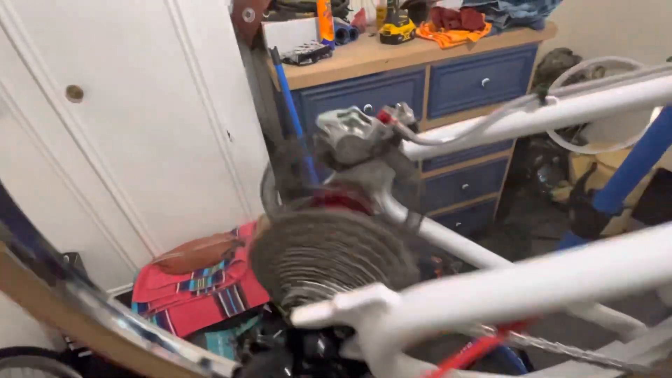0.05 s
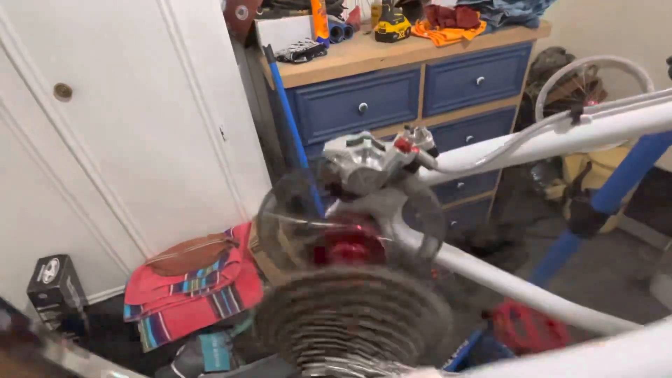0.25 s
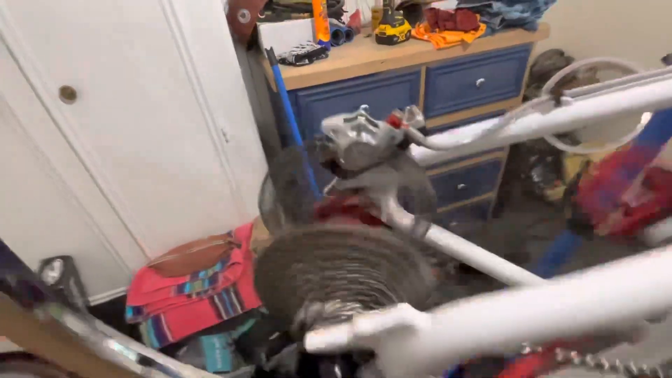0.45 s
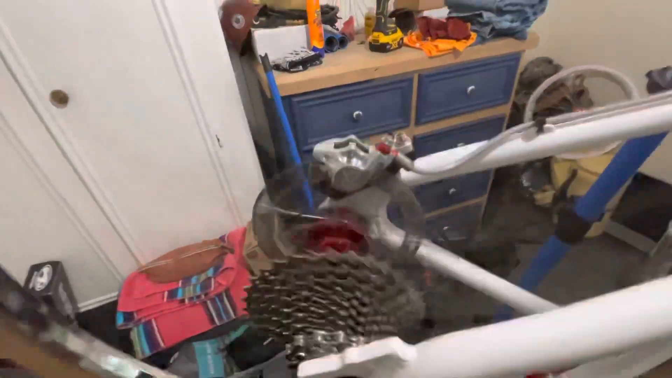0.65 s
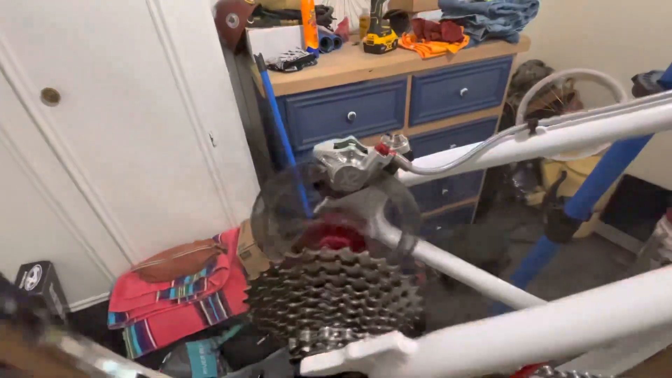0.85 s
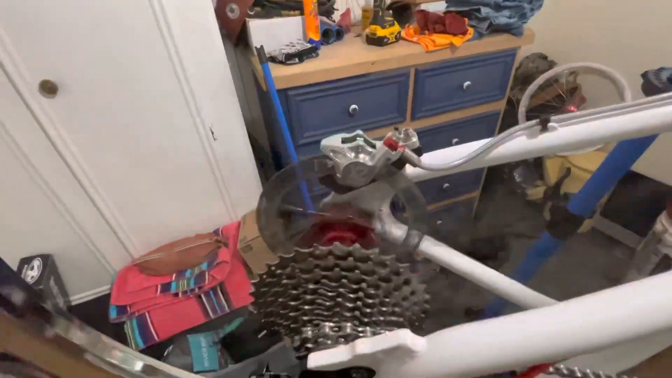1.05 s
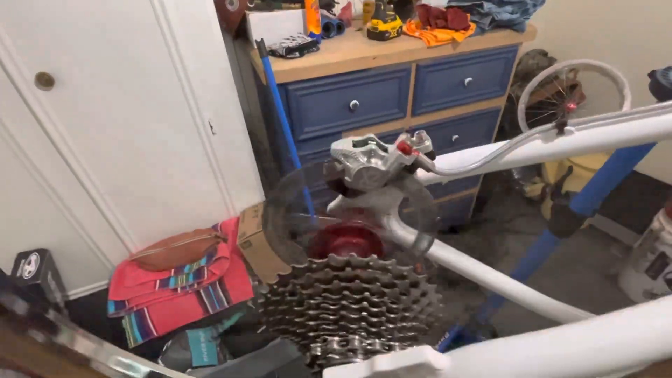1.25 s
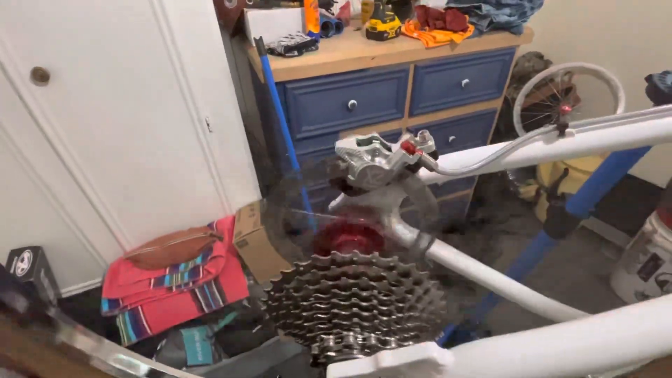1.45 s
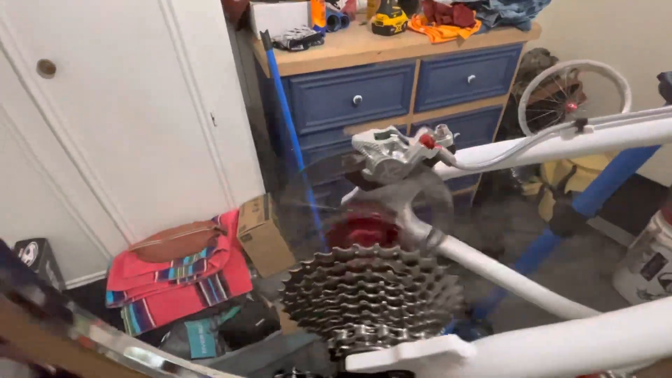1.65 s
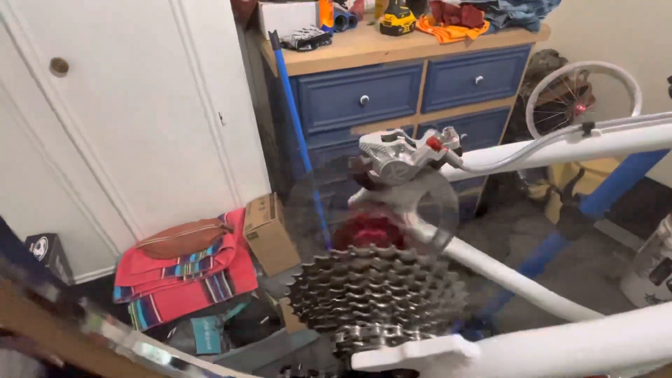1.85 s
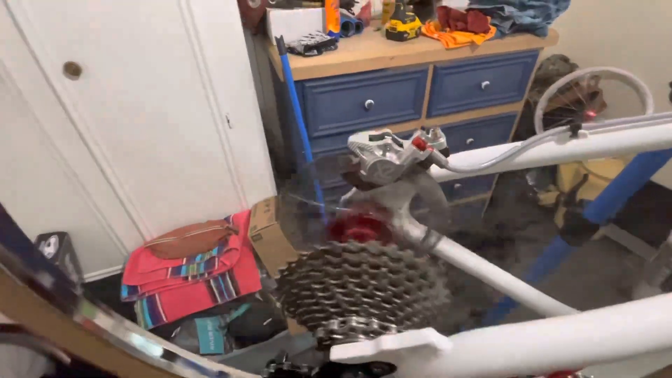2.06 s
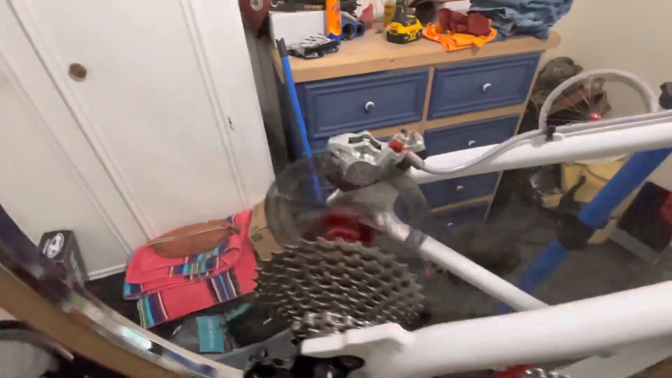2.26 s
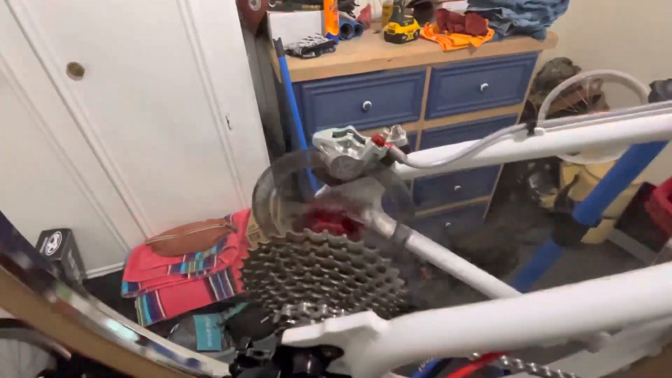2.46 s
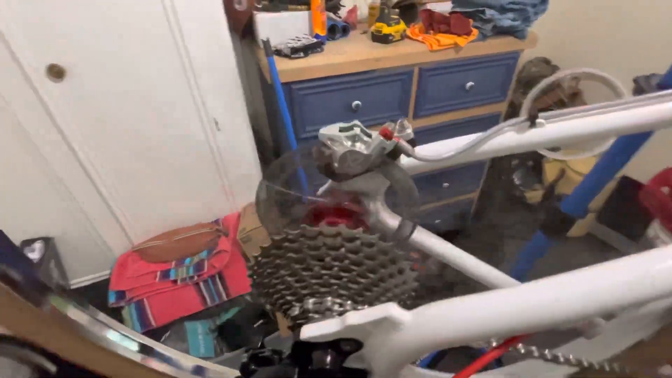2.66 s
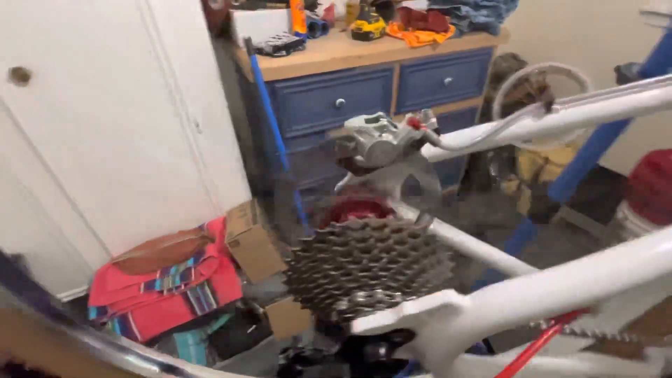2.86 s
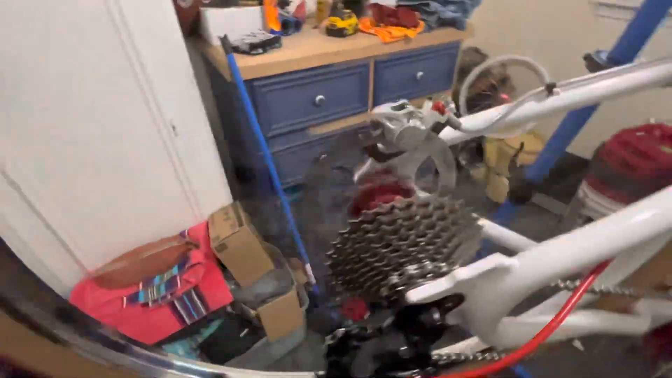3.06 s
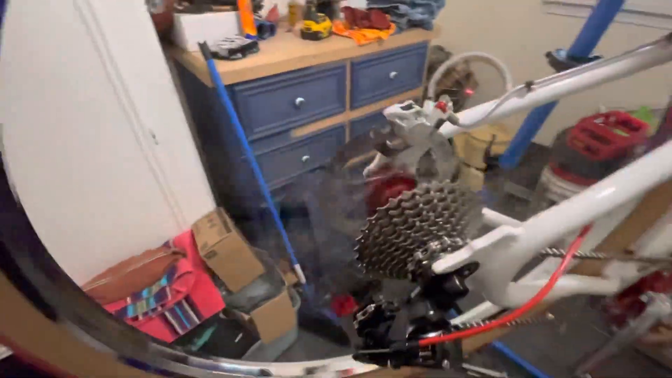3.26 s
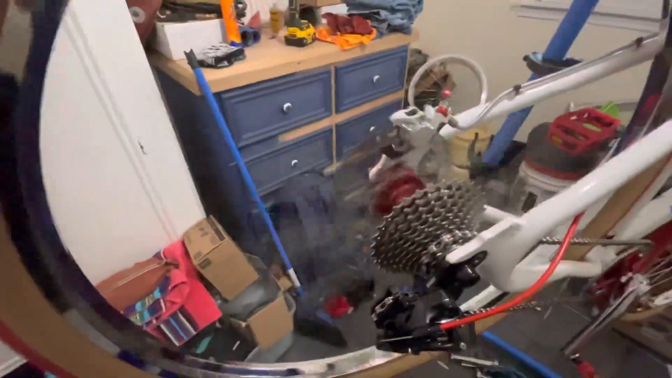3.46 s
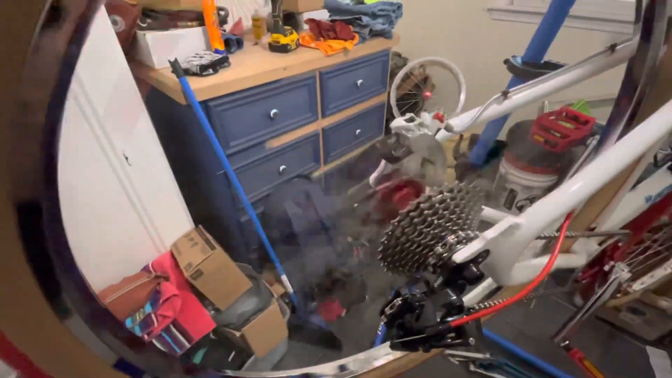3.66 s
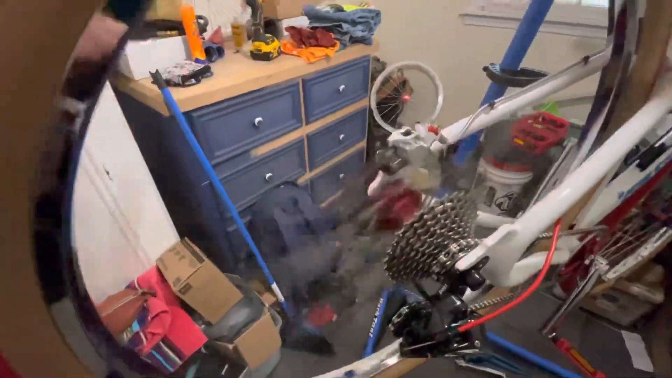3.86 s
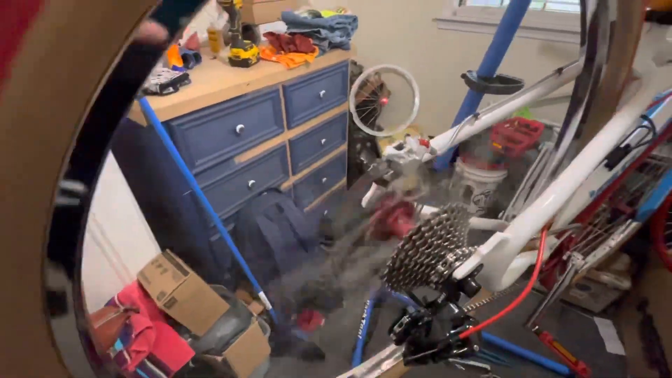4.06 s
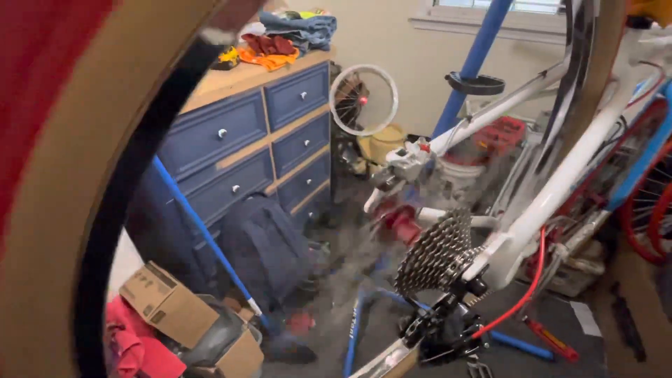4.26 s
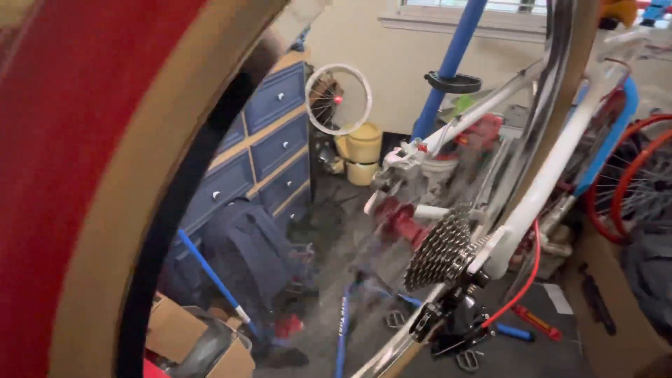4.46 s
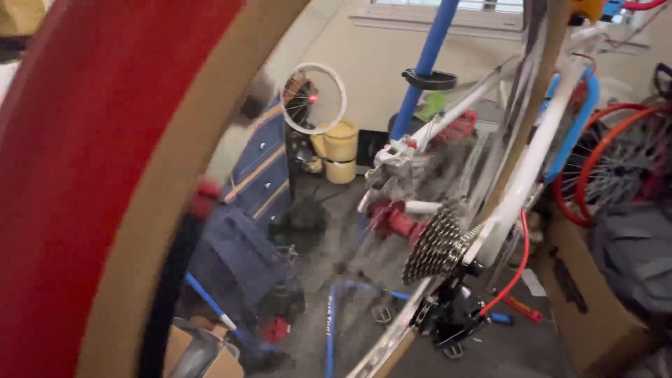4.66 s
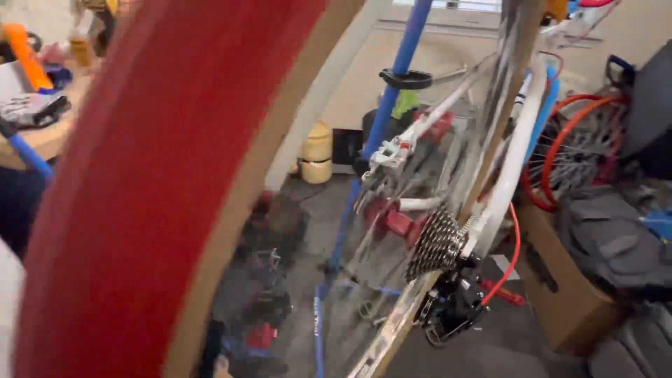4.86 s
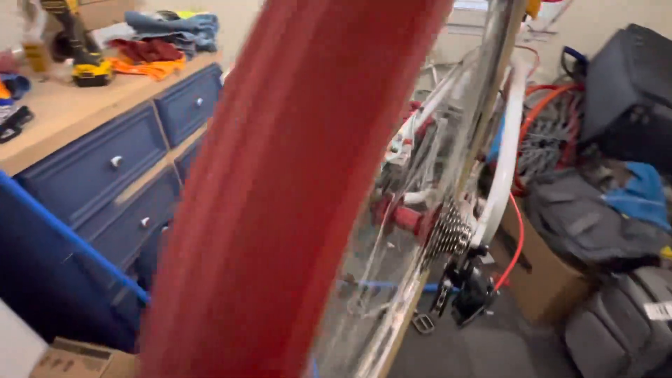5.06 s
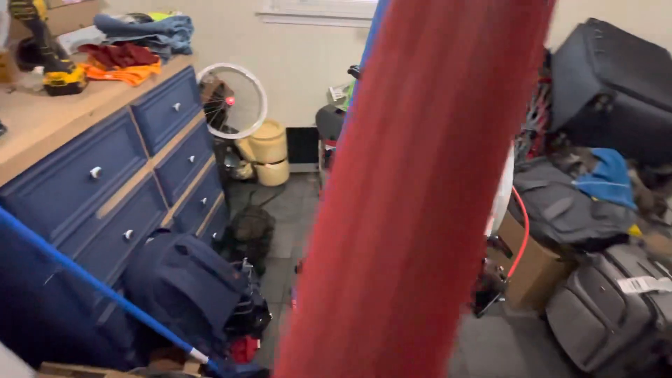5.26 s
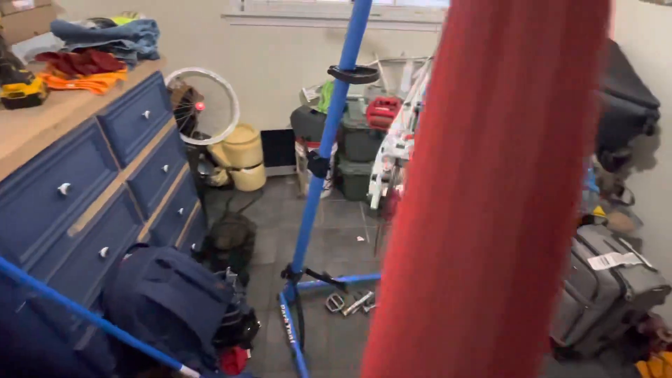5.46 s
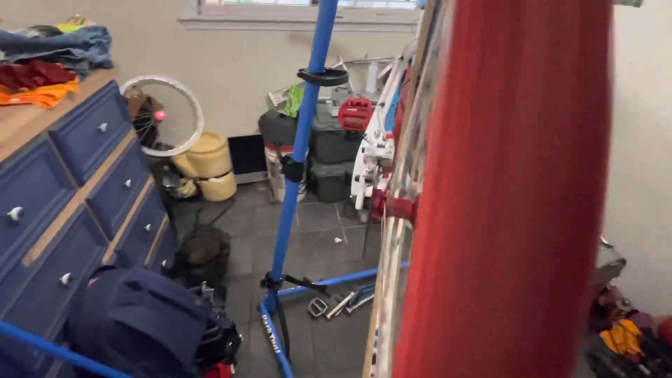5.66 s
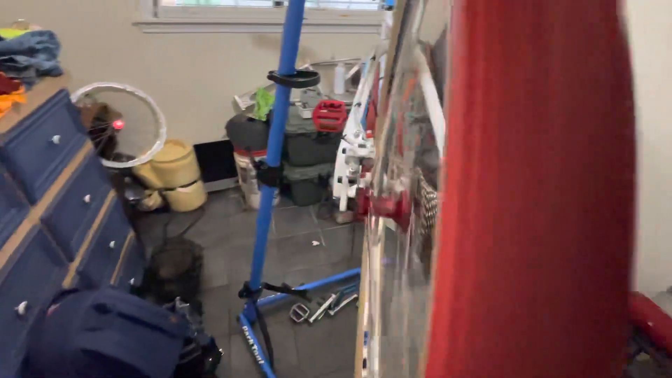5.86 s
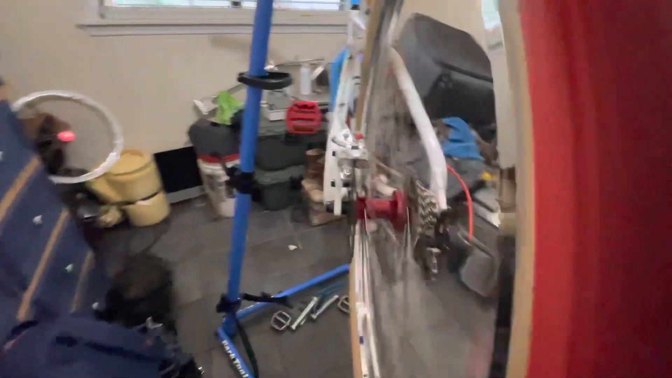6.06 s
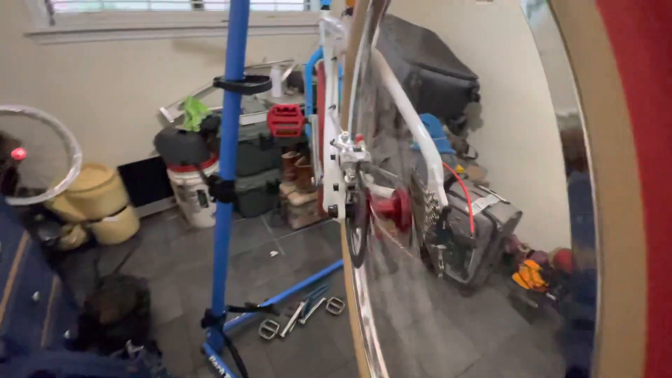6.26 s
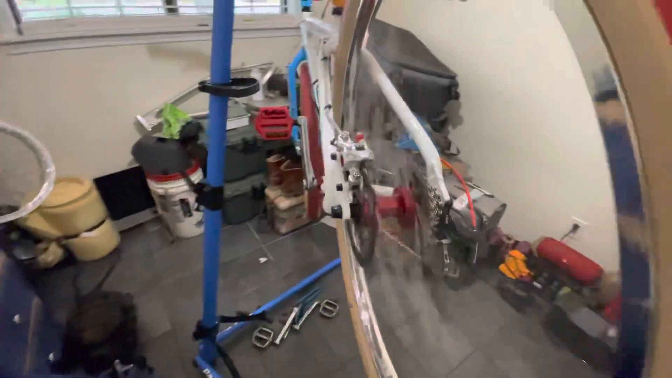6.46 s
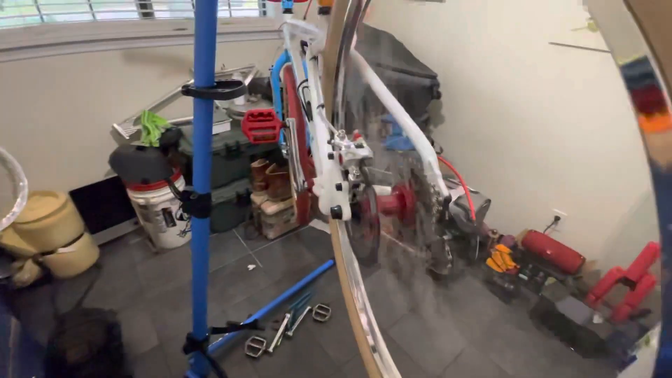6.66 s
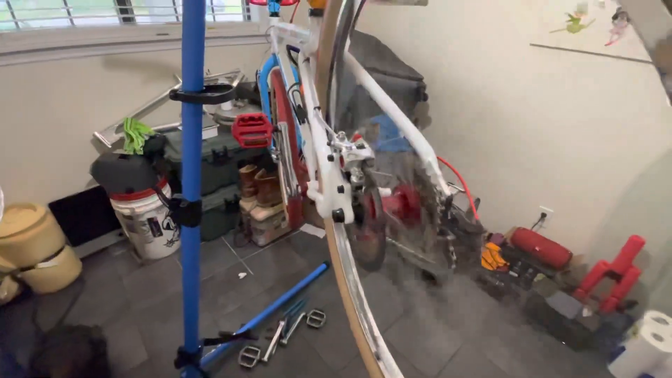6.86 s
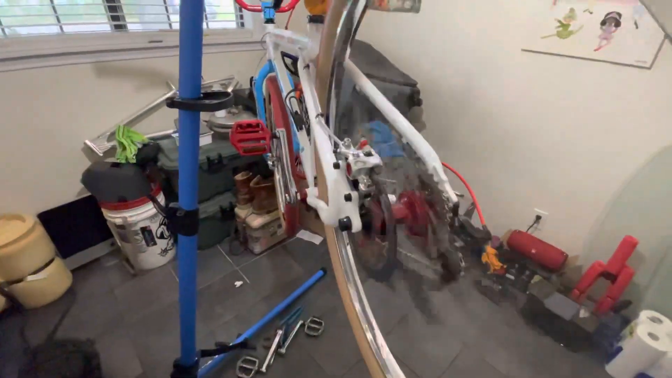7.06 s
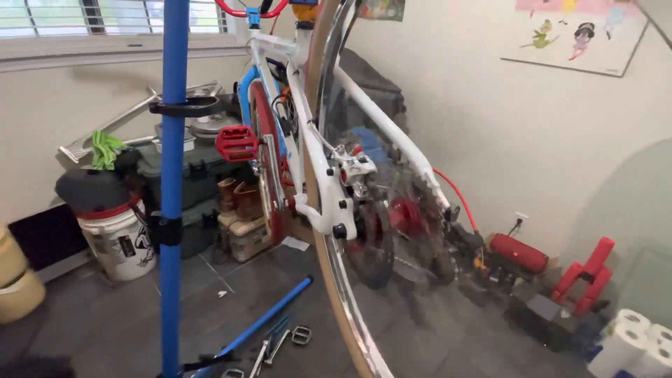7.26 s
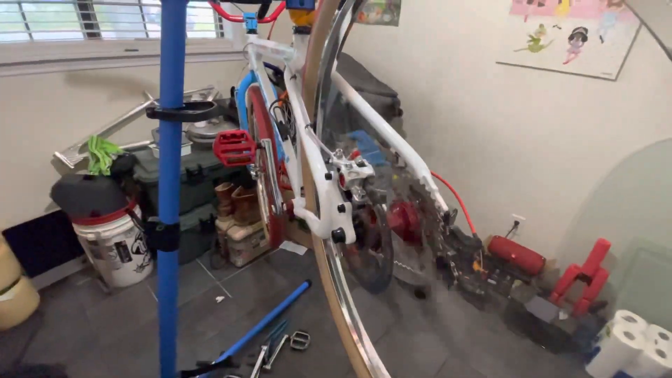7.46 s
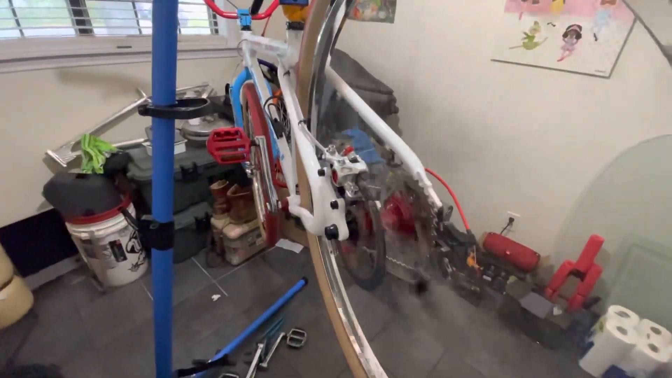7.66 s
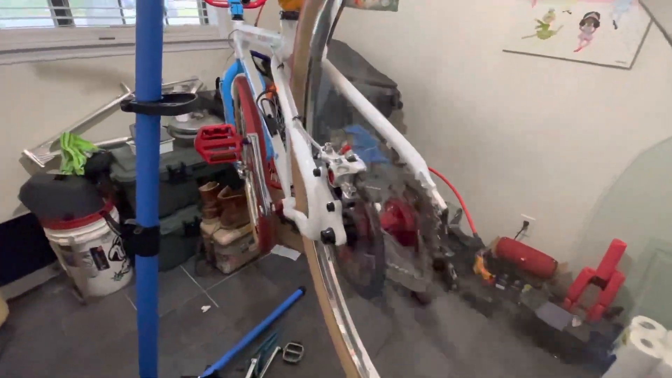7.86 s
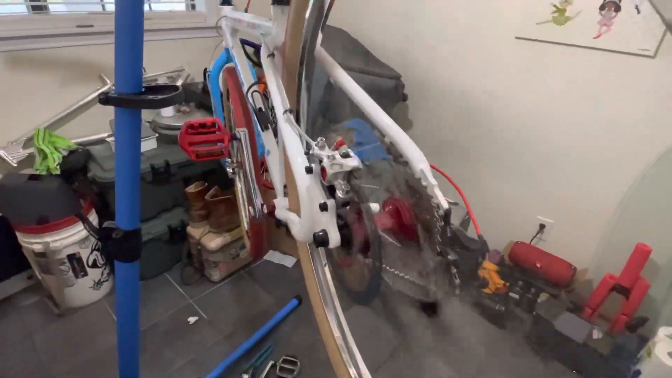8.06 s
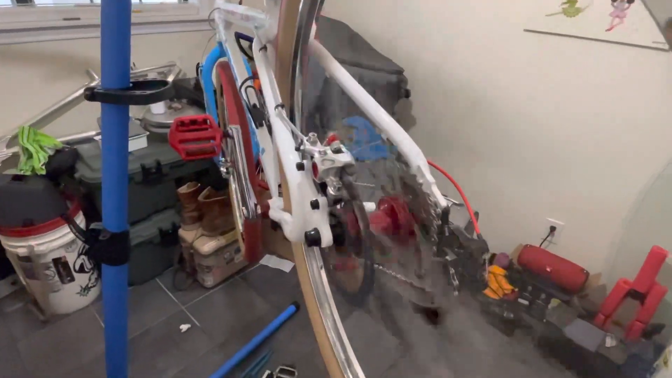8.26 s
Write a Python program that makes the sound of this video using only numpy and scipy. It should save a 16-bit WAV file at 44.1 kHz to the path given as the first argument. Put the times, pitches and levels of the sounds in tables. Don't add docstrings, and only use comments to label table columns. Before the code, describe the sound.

Loud, bright ratcheting buzz of a coasting bicycle hub in a small room, after half a second of chain clatter, still spinning at the end.

```python
import sys
import numpy as np
from scipy import signal
from scipy.fft import rfft, irfft
from scipy.io import wavfile
from scipy.ndimage import uniform_filter1d

SR = 44100
rng = np.random.default_rng(int(sys.argv[2]) if len(sys.argv) > 2 else 0)


def persist_wave(psi):
    counts = np.round(np.clip(psi, -1, 1) * 32767).astype(np.int16)
    wavfile.write(sys.argv[1], SR, np.atleast_2d(counts).T)


def rack_gain(trim_db):
    fader = np.asarray(trim_db, float)
    return 10 ** (fader / 20)


N = 366912
RING_TEETH = 68
# t/s, level/dB
GUSTS = [
    [(0.0, -43.5), (0.12, -49), (0.46, -49), (0.99, -45), (1.25, -49), (1.4, -52), (1.63, -57), (1.87, -62),
     (2.0, -81)],
    [(2.3, -75), (2.59, -62), (2.884, -61), (2.996, -74), (3.2, -77)],
    [(4.95, -65), (5.14, -64), (5.312, -40), (5.402, -44.5), (5.598, -55), (5.698, -62), (5.83, -62),
     (6.0, -78)],
]


def hub():
    # t/s, teeth passing a pawl f/Hz
    teeth = [(0.53, 122.9), (0.57, 196), (0.61, 267.2), (0.75, 326), (0.81, 314.8), (0.94, 332.3),
             (1.05, 321), (1.24, 335), (1.51, 319.5), (1.98, 333.9), (2.07, 347.7), (2.35, 312),
             (2.44, 315.6), (2.61, 287), (2.8, 302.1), (5.9, 271.6), (8.32, 249.7)]
    # t/s, level/dB, resonance f/Hz
    shell_heard = [(0.53, -27.5, 9000), (0.61, -19, 8840), (0.77, -24, 8760), (1.05, -22, 8900),
                   (1.37, -27, 9100), (2.46, -26.5, 8800), (3.0, -27.5, 9060), (3.5, -28.5, 8760),
                   (3.65, -28.5, 8700), (4.5, -29, 8800), (5.2, -31.5, 9240), (5.67, -30.5, 8860),
                   (6.1, -27, 9200), (6.93, -26.5, 8980), (7.45, -26, 9080), (8.32, -26.5, 8800)]
    # f/Hz, density/dB per Hz
    click = [(480, -17), (610, -11.5), (750, -17.5), (880, -7.5), (1100, -5), (1330, 4), (1550, 3),
             (2400, 5.5), (3300, -2.5), (4150, -8), (5200, -6), (5900, -6), (6500, -4), (7900, 2),
             (9300, -5), (11800, -16), (12800, -21), (14300, -21.5), (15800, -16.5)]
    # f/Hz, level/dB, t60/s, change on the far side/dB
    modes = [(2400, -22, .025, 1), (3290, -21, .018, 3), (3890, -33, .03, 4), (4520, -26, .02, 2),
             (5300, -26, .014, 3.5), (6240, -29, .02, -1), (8000, -16, .007, 1), (8900, -17, .007, -1),
             (9722, -17.5, .028, -1), (10640, -22, .025, 1.5), (12225, -24, .025, 4), (13160, -28, .035, 3),
             (14138, -24.5, .035, -2), (14359, -23, .1, 0)]
    # t/s, level/dB
    cogs_in_view = [
        (0, -3),
        (2.5, -2.5),
        (4.5, -5),
        (5.4, -12.5),
        (6.2, -8.5),
        (8.32, -4),
    ]
    # t/s, level/dB
    rattle = [(0.5, 4), (0.8, 3), (1.2, 3.5), (2.2, 2.5), (3, 3), (4.6, 3.5), (5.4, 3.5), (6.5, 2.5),
              (8.32, 3.5)]
    crossovers = [2810, 6210, 8260, 11380]
    far_side_s = 5.0, 6.0

    turning, teeth_hz = curves(teeth)
    phase = np.cumsum(teeth_hz * (turning > .5)) / SR
    drops, rebounds = pawls(phase)
    strikes = drops + rack_gain(11) * band(rebounds, 6300, 21500, order=5)
    strikes = smear(strikes + rack_gain(curves(rattle)[1]) * band(rebounds, 2420, 6200, order=1))
    strikes = level(colour(strikes, click), 0)

    _, facing_db = curves(cogs_in_view)
    far = np.interp(np.arange(N) / SR, far_side_s, [0, 1])
    body = strikes
    for hz, db, t60, far_db in modes:
        view_db = facing_db + far_db * far + glint_db(hz) + 1.4 * walk(3)
        body = body + level(ring(strikes, hz, t60), db + 1.5) * rack_gain(view_db)
    body = spokes(body, phase)
    body = body + rack_gain(-7) * walls(body)

    wheel, middle, low_shell, high_shell, top = split(body, crossovers)
    gate, shell_db, shell_hz = curves(shell_heard)
    lean_db = 10.5 * (shell_hz - 8400) / 1000
    shell = low_shell * rack_gain(-lean_db) + high_shell * rack_gain(lean_db)
    parts = [(shell, 0.072 * walk(4.1)), (wheel, -11 - 0.52 * facing_db),
             (middle, -5.5), (top, 1.06 + 0.12 * facing_db)]
    mix = sum(level(x, db) * rack_gain(0.34 * walk(12)) for x, db in parts)
    return gate * rack_gain(shell_db + 0.4 * walk(35)) * mix


def pawls(phase, scatter_db=1.63, runout=0.011, wander=0.015, bounce_s=0.000403):
    # error in place/tooth, spring strength level/dB
    seats = [(0.05, -7), (0.09, -10), (0.08, -7.5), (0.06, -9.5), (0.02, -7), (0.01, -6)]
    # t/s, share of their error
    off_place = [(0.5, 1.04), (0.9, 1.33), (1.3, 1.87), (1.9, 1.9), (2.5, 1.37), (2.8, 0.99), (4.4, 0.78),
                 (5.5, 0.82), (7, 1.01), (8.32, 0.94)]
    cranks_stop_s, crank_shake = 2.6, 1.2

    t, cut = np.arange(N) / SR, round_wheel(count=2, size=4)
    clock = phase + t * 1e-6
    drops, rebounds, drop = np.zeros(N), np.zeros(N), np.arange(3000)
    spread = np.interp(drop, clock, curves(off_place)[1])
    for k, (error, db) in enumerate(seats):
        chance = rng.standard_normal((len(drop), 6))
        seat = k * RING_TEETH / len(seats)
        tooth = (drop + int(seat)) % RING_TEETH
        drift = wander * walk(5)[drop * (N // len(drop))]
        place = drop + 1 - seat % 1 + error * spread + runout * cut[0, tooth] + drift
        s = np.interp(place, clock, t, right=N)
        force = rack_gain(db + 0.1 * cut[1, tooth] + scatter_db * chance[:, 0])
        s = s + 1.25e-5 * (1 + crank_shake * (s < cranks_stop_s)) * chance[:, 1]
        drops -= impulses(s, force)
        first_s = s + bounce_s * (.5 + np.abs(chance[:, 2]))
        second_s = s + bounce_s * (1.506 + np.abs(chance[:, 4]))
        rebounds += impulses(first_s, force * np.tanh(chance[:, 3]))
        rebounds += impulses(second_s, 0.97 * force * np.tanh(chance[:, 5]))
    return drops, rebounds


def smear(x, share=0.62):
    shell_paths = [5, 11, 19, 31]
    for lag in shell_paths:
        gap = np.zeros(lag - 1)
        x = signal.lfilter(np.r_[-share, gap, 1], np.r_[1, gap, -share], x)
    return x


def glint_db(ring_hz):
    # t/s, ring f/Hz, level/dB, half length/s
    glints = [(0.9, 12225, 3, .3), (1.4, 12225, -4, .15), (1.85, 12225, 4, .25), (2.3, 14138, 3, .35),
              (2.8, 14138, -6, .15), (2.4, 9722, -4, .2), (3.0, 9722, 3, .3), (3.45, 10640, 5, .3),
              (3.45, 12225, 3, .2), (4.45, 5250, 6, .3), (4.4, 14138, 3, .3), (4.5, 14359, -5, .2),
              (6.5, 13160, 4, .4), (6.7, 4520, 4, .3), (7.2, 3890, 7, .12), (1.6, 8000, -6, .4),
              (.75, 8900, 3, .2), (.75, 14138, -4, .3), (4.5, 8000, 3, .5), (6.6, 8900, 3, .5),
              (1.55, 3290, 3, .4), (2.3, 6240, 3, .3), (3.2, 6240, 3, .3), (5.5, 3290, 4, .3),
              (7.7, 3290, 3, .5), (7.9, 5250, 3, .5), (7.9, 3890, 4, .3)]
    t = np.arange(0, N, 64) / SR
    total_db = np.zeros(len(t))
    for s, hz, db, half_s in glints:
        if hz == ring_hz:
            total_db += db * np.exp(-((t - s) / half_s) ** 2)
    return np.repeat(total_db, 64)[:N]


def spokes(body, phase, flicker_db=5.5):
    pattern_edges = [1050, 1500, 2200, 3000]
    lobe_depths = [0.4, 0.2, 0.2, 0.18, 0.05]
    close_levels = [0.88, 0.24, -0.59, -1.5, 0.6]
    late_levels = [2, 2, 3.5, -1.5, 0.5]

    lobes = round_wheel(count=len(lobe_depths), size=3)
    angle, teeth = phase % RING_TEETH, np.arange(RING_TEETH + 1)
    t = np.arange(N) / SR
    close = np.interp(t, (1.52, 2.8), [1, 0])
    late = np.interp(t, (7.0, 8.64), [0, 1])
    bands = split(body, pattern_edges, octaves=0.039)
    out = np.zeros(N)
    for x, lobe, depth, close_db, late_db in zip(bands, lobes, lobe_depths, close_levels, late_levels):
        sweep = 1 + depth * np.interp(angle, teeth, np.append(lobe, lobe[0]))
        out += x * sweep * rack_gain(close_db * close + late_db * late + flicker_db * depth * walk(30))
    return out


def round_wheel(count, size):
    x = rng.standard_normal((count, RING_TEETH))
    for _ in range(2):
        x = uniform_filter1d(x, size, mode="wrap")
    x = x - x.mean(axis=1, keepdims=True)
    return x / x.std(axis=1, keepdims=True)


def chain(t60=0.011, hiss_db=0.5, width=0.043, settle_s=0.0031, settle_db=-8):
    # t/s, peak level/dB, ring f/Hz, low part/dB
    links = [(0.0054, -21, 10600, -15), (0.0197, -14, 6950, -19), (0.0264, -20, 8270, -19),
             (0.038, -19, 7930, -24), (0.046, -25, 7720, -17), (0.0628, -23, 10200, -11),
             (0.081, -18, 10300, -20), (0.1015, -17.5, 10000, -12), (0.119, -22, 9970, -17),
             (0.1381, -25, 11000, -12), (0.1467, -21.5, 6600, -9), (0.1564, -26, 9250, -15),
             (0.1744, -19, 7920, -11), (0.181, -19.5, 8000, -15), (0.1883, -15, 7500, -12),
             (0.2113, -18, 7790, -13), (0.229, -21, 7880, -17), (0.247, -21, 7890, -18),
             (0.255, -26, 9380, -20), (0.2613, -13.5, 7700, -8), (0.2654, -20, 10200, -9),
             (0.2833, -21, 10100, -10), (0.2904, -20, 8250, -7), (0.302, -28, 7010, -15),
             (0.32, -22, 9960, -15), (0.336, -21, 10800, -9), (0.355, -21, 10000, -15),
             (0.367, -20, 8300, -11), (0.39, -19, 10600, -8), (0.404, -20.5, 6000, -18),
             (0.4254, -24, 9310, -20), (0.4429, -26, 9610, -19), (0.461, -24, 8260, -18),
             (0.4774, -19, 7780, -12), (0.496, -18, 10200, -7), (0.5134, -30, 6130, -9),
             (0.531, -14, 8300, -19), (0.5365, -12, 8630, -24), (0.544, -13, 11000, -18),
             (0.5516, -5, 8360, -17)]
    # f/Hz, density/dB per Hz
    whirr_colour = [(88, -6), (609, -3.5), (712, -1), (2330, -3.5), (2520, -3), (4100, -8), (4520, -9.5),
                    (7350, -9), (11000, -11), (12000, -18), (15700, -11)]
    # t/s, level/dB
    chain_run = [(0.0, -33), (0.17, -34.5), (0.19, -31.5), (0.3, -32.5), (0.33, -32), (0.43, -33.5),
                 (0.52, -32.5), (0.62, -31)]

    out, t = np.zeros(N), np.arange(2000) / SR
    fade = np.exp(-np.log(1000) * t / t60) * np.minimum(t / .001, 1)
    fade = fade + rack_gain(settle_db) * np.interp(t - settle_s, t, fade, left=0)
    for s, db, hz, low_db in links:
        burst = rng.standard_normal((3, len(t))) * fade
        tick = level(band(burst[0], hz * (1 - width), hz * (1 + width), order=1), 0)
        tick = tick + level(band(burst[1], 2200, 14900), hiss_db)
        low = band(burst[2], 800, 2300) * rack_gain(min(low_db, -9) + 12)
        start = int(s * SR)
        out[start:start + len(t)] += rack_gain(db - 1.0) * (tick / np.abs(tick).max() + low)
    gate, run_db = curves(chain_run)
    whirr = level(colour(rng.standard_normal(N), whirr_colour), -2.5) * rack_gain(run_db + 2.0 * walk(60)) * gate
    return out + rack_gain(-14.0) * walls(out) + whirr


def gusts():
    # t/s, level/dB, upper part/dB, length/s
    puffs = [(0.03, -29, -7, 0.026), (0.223, -31, -23, 0.05), (0.29, -47, -4, 0.029),
             (0.384, -37, 0, 0.039), (0.463, -44, 16, 0.023), (0.648, -28, -5, 0.035),
             (0.671, -24.5, 6, 0.018), (0.778, -31.5, 2, 0.032), (0.928, -32, -16, 0.048),
             (0.94, -32, -15, 0.014), (1.063, -16.5, -6, 0.057), (1.111, -26.5, 1, 0.037),
             (1.195, -27, -16, 0.016), (1.418, -43, -25, 0.058), (1.575, -42, -17, 0.027),
             (2.794, -46, -16, 0.036), (2.912, -45, -16, 0.026), (3.013, -43, -14, 0.027),
             (5.047, -37, -21, 0.031), (5.104, -37, -36, 0.03), (5.247, -23, -10, 0.057),
             (5.291, -20.5, -29, 0.029), (5.413, -33, -13, 0.043), (5.512, -25, -12, 0.06),
             (5.558, -24, -21, 0.018), (5.645, -22, -2.5, 0.067), (5.673, -21, -21, 0.012),
             (5.734, -23, -41, 0.018), (5.804, -36, -26, 0.05), (5.869, -47, -25, 0.035),
             (6.271, -42, -10, 0.046), (6.339, -47, -20, 0.04)]
    puff_rise = 0.5
    low = even(band(rng.standard_normal(N), 28, 141, order=2), span_s=0.039)
    high = even(band(rng.standard_normal(N), 180, 420, order=2), span_s=0.0084)
    t, out = np.arange(N) / SR, np.zeros(N)
    for table in GUSTS:
        gate, db = curves(table, fade_s=0.049)
        out += gate * rack_gain(db + 0.65 * walk(40)) * low
    for s, db, upper_db, length_s in puffs + eddies():
        near = slice(max(int((s - .15) * SR), 0), int((s + .15) * SR))
        late = t[near] - s + 0.19 * length_s
        shape = np.exp(-(late / (0.5 * length_s * np.where(late < 0, puff_rise, 1))) ** 2)
        out[near] += rack_gain(db - 7.5) * shape * (low[near] + rack_gain(upper_db - 2.0) * shape * high[near])
    return out


def eddies(per_s=16):
    rows = []
    for table in GUSTS:
        s, db = np.transpose(table)
        at = np.arange(s[0], s[-1], 1 / per_s)
        chance = rng.standard_normal((40, 4))[:len(at)].T
        at = at + chance[0] / (3 * per_s)
        eddy_db = np.interp(at, s, db) + 9 + 2.5 * chance[1]
        upper_db = -25 + 5 * chance[2]
        length_s = 0.013 * rack_gain(2.7 * chance[3])
        rows += zip(at, eddy_db, upper_db, length_s)
    return rows


def knocks(glide=5.25, glide_s=0.0039):
    # t/s, peak level/dB, f/Hz, t60/s
    thumps = [
        (7.273, -39, 85, 0.2),
    ]
    out, t = np.zeros(N), np.arange(8000) / SR
    for s, db, hz, t60 in thumps:
        turns = np.cumsum(hz * (1 + glide * np.exp(-t / glide_s))) / SR
        fade = np.exp(-np.log(1000) * t / (0.75 * t60))
        start = int(s * SR)
        out[start:start + len(t)] += rack_gain(db) * np.sin(2 * np.pi * turns) * fade
    return out


def room():
    # f/Hz, density/dB per Hz
    hum = [(15, -57), (25, -4), (70, -1.5), (135, -3), (184, -5.5), (220, 0.5), (494, -8), (522, -7),
           (560, -5.5), (700, -7.5), (910, -3.5), (1540, -120)]
    # t/s, level/dB
    whoosh = [(0, 6.5), (2, 1.5), (4.8, 2), (6.3, 4.5), (8.32, 3)]
    return level(colour(rng.standard_normal(N), hum), -59) * rack_gain(curves(whoosh)[1] + 0.52 * walk(5.4))


def walls(x, size=4096, t60=0.33):
    t, out = np.arange(int(t60 * SR)) / SR, np.zeros(N + 40000)
    fade = np.exp(-np.log(1000) * t / t60) * (t > .003)
    window = np.sin(np.pi * np.arange(2 * size) / (2 * size))
    x = np.pad(x, (size, 2 * size))
    for at in range(0, N + size, size):
        if not x[at:at + 2 * size].any():
            continue
        echo = signal.fftconvolve(x[at:at + 2 * size] * window, rng.standard_normal(len(t)) * fade)
        out[at:at + len(echo)] += echo[:len(out) - at]
    return out[size:size + N] / np.linalg.norm(fade)


def level(x, db):
    return x * rack_gain(db) / np.sqrt(np.mean(x ** 2))


def curves(table, off_db=-120, fade_s=0.023):
    s, *columns = np.transpose(table)
    t = np.arange(N) / SR
    gate = rack_gain(np.interp(t, [s[0] - fade_s, s[0], s[-1], s[-1] + fade_s], [off_db, 0, 0, off_db]))
    return [gate] + [np.interp(t, s, c) for c in columns]


def band(x, lo_hz, hi_hz, order=3):
    return signal.sosfilt(signal.butter(order, [lo_hz, min(hi_hz, .45 * SR)], "band", fs=SR, output="sos"), x)


def colour(x, points, size=4096):
    hz, db = np.transpose(points)
    f = np.maximum(np.arange(size // 2 + 1) * SR / size, 1)
    cep = irfft(np.log(rack_gain(np.interp(np.log(f), np.log(hz), np.maximum(db, -70)))))
    cep[1:size // 2] *= 2
    cep[size // 2 + 1:] = 0
    return signal.oaconvolve(x, irfft(np.exp(rfft(cep))))[:len(x)]


def ring(x, hz, t60):
    r = np.exp(-np.log(1000) / (t60 * SR))
    return signal.lfilter([1, 0, -1], [1, -2 * r * np.cos(2 * np.pi * hz / SR), r * r], x)


def walk(rate, count=64):
    k, steps = int(SR / count / rate) + 1, N // count + 1
    w = np.repeat(rng.standard_normal(1000), k)
    w = uniform_filter1d(uniform_filter1d(w, k), k)[:steps]
    return np.interp(np.arange(N) / count, np.arange(steps), w / w.std())


def impulses(s, size, count=8):
    out, at = np.zeros(N + 2 * count + 1), np.clip(s * SR, 0, N)
    k = np.arange(-count, count + 1)[:, None]
    d = k - at % 1
    np.add.at(out, at.astype(int) + k + count, size * np.sinc(d) * np.cos(np.pi * d / (2 * count + 2)) ** 2)
    return out[count:count + N]


def even(x, span_s):
    return x / np.sqrt(uniform_filter1d(x ** 2, int(span_s * SR)) + 1e-12)


def split(x, edges_hz, octaves=0.25):
    f, spectrum = np.arange(len(x) // 2 + 1) * SR / len(x) + 1, rfft(x)
    above = [1] + [.5 + .5 * np.tanh(np.log2(f / hz) / octaves) for hz in edges_hz] + [0]
    return [irfft(spectrum * (a - b), len(x)) for a, b in zip(above, above[1:])]


def scene():
    return np.tile(hub() + chain() + gusts() + knocks() + room(), (2, 1))


def band_limit(x):
    return signal.sosfilt(signal.butter(12, 17030, fs=SR, output="sos"), x)


def record(dry):
    # t/s, level under the sound/dB
    splits = [(0.985, -12), (1.426, -15), (1.543, -9), (2.064, -8), (2.172, -9), (2.337, -7), (2.693, -17),
              (2.825, -17), (2.99, -12), (3.385, -10), (3.57, -11), (4.328, -14), (4.468, -9), (4.791, -13),
              (4.865, -8), (5.074, -7), (5.672, -10), (6.003, -9), (6.256, -9), (6.382, -8), (7.448, -18),
              (7.791, -10), (8.26, -6)]
    dry = signal.sosfilt(signal.butter(6, 58, "high", fs=SR, output="sos"), dry)
    dry = .8 * np.tanh(dry / .8)
    t, apart = np.arange(N) / SR, np.zeros(N)
    for s, db in splits:
        apart += rack_gain(db) * np.cos(np.clip((t - s) * SR / 1024, -1, 1) * np.pi / 2)
    side = apart * band(np.roll(dry[0], 3000), 4600, 19000, order=8)
    wet = dry + np.outer([1, -1], side)
    wet = signal.sosfilt(signal.ellip(14, .2, 80, 15720, fs=SR, output="sos"), wet)
    return band_limit(wet)


dry = scene()
out = record(dry)
persist_wave(out)
```